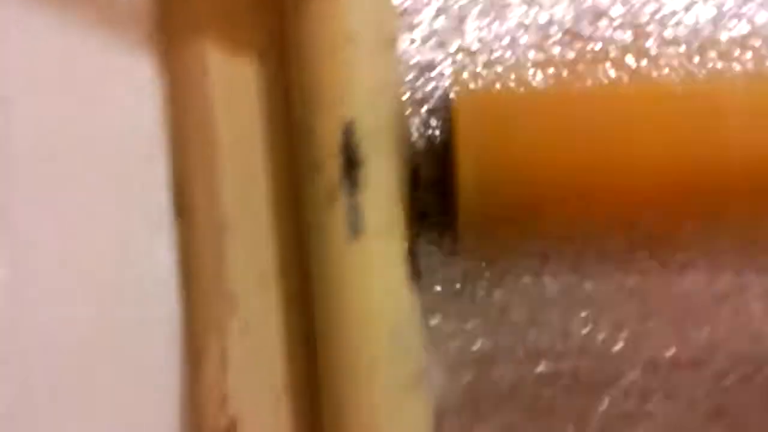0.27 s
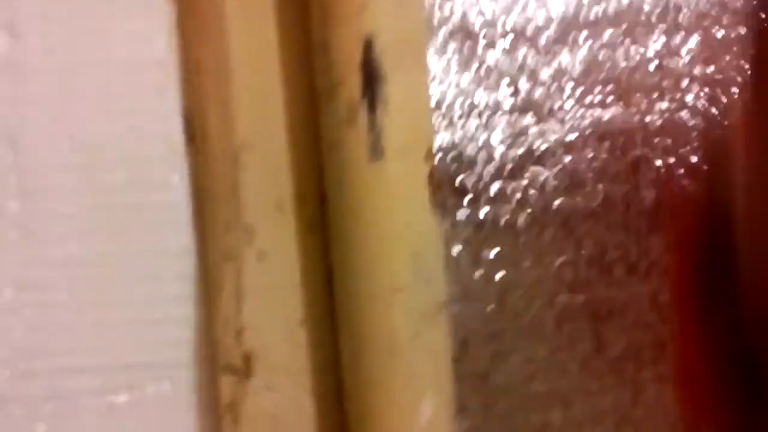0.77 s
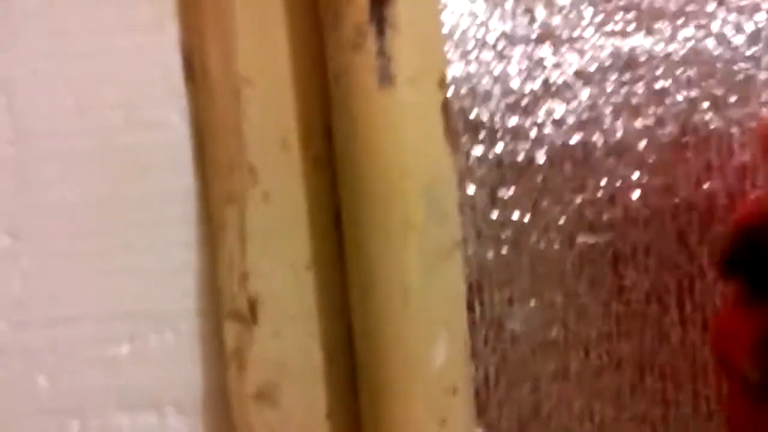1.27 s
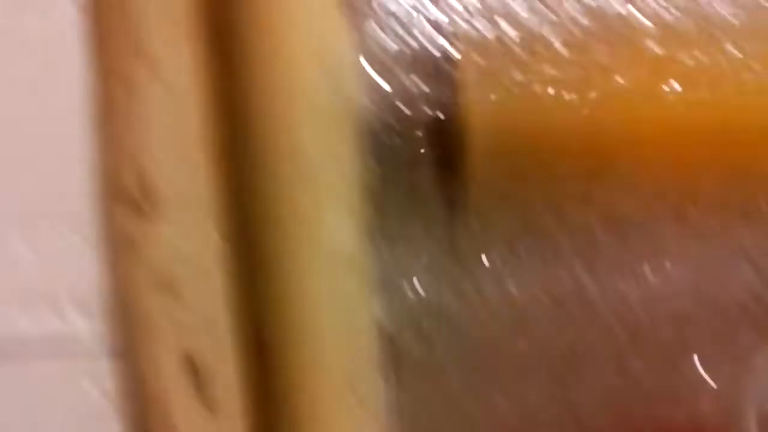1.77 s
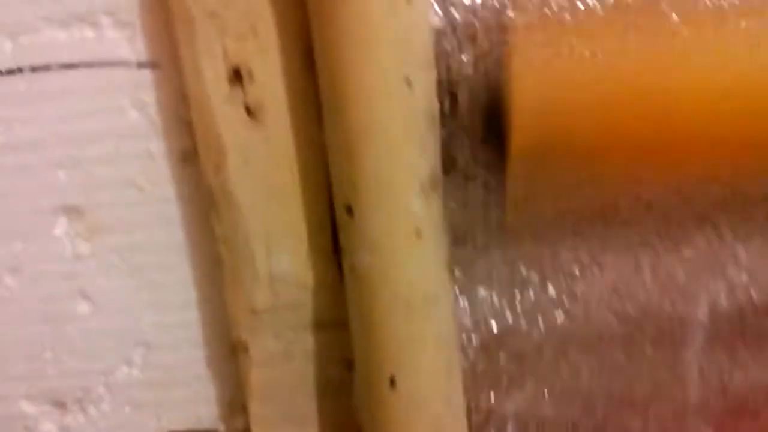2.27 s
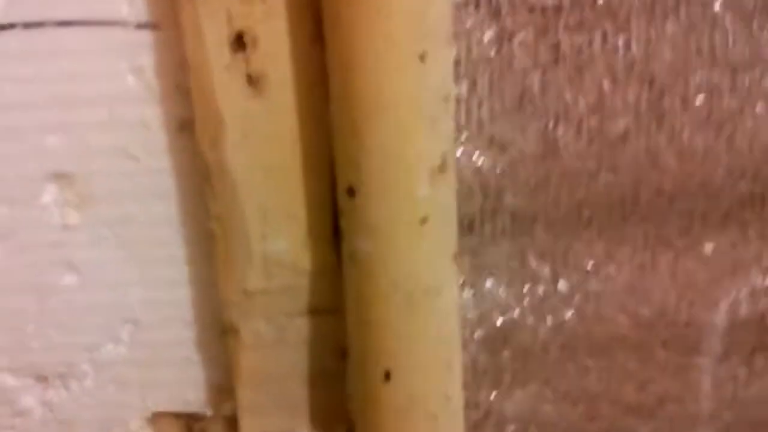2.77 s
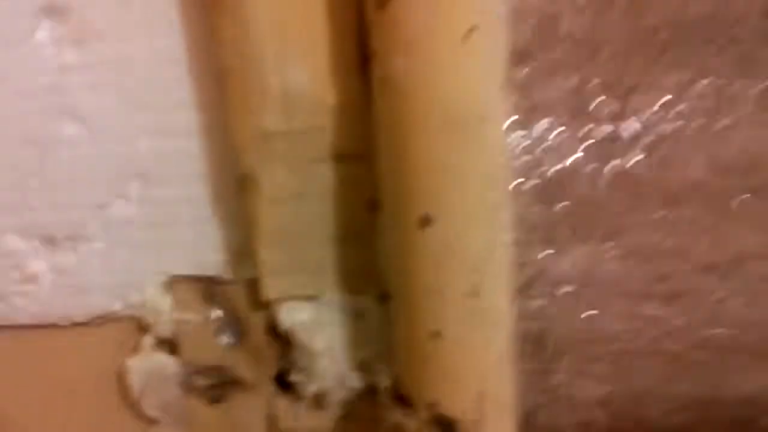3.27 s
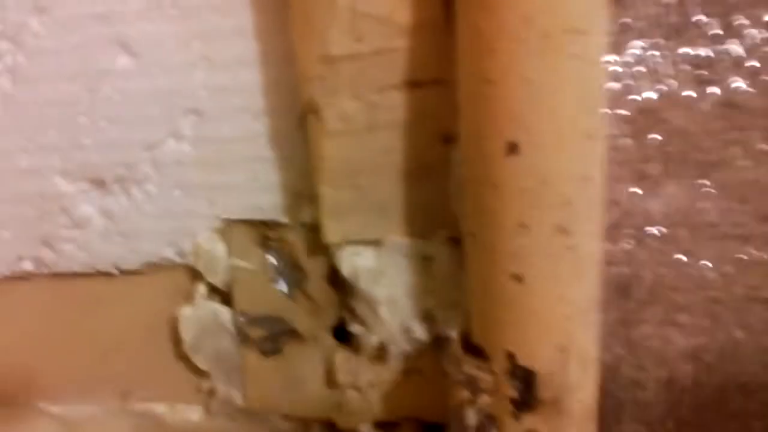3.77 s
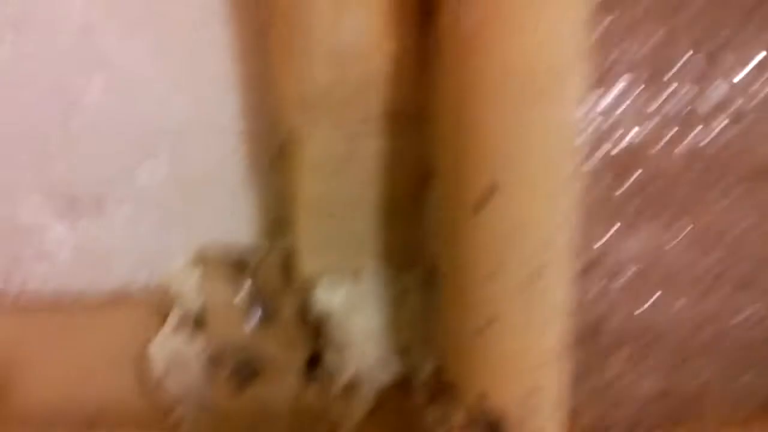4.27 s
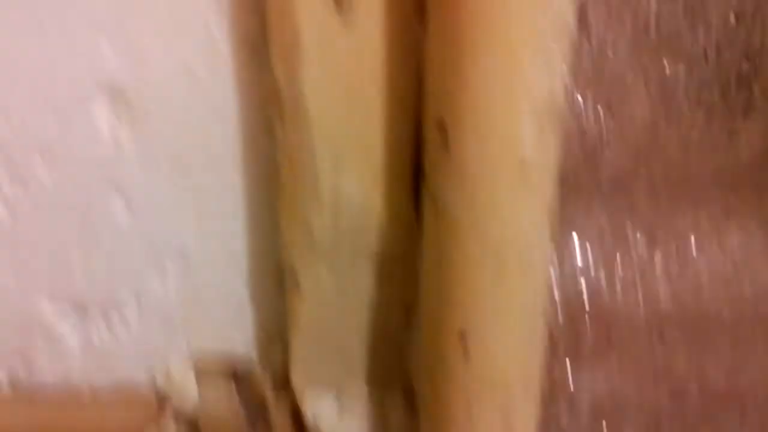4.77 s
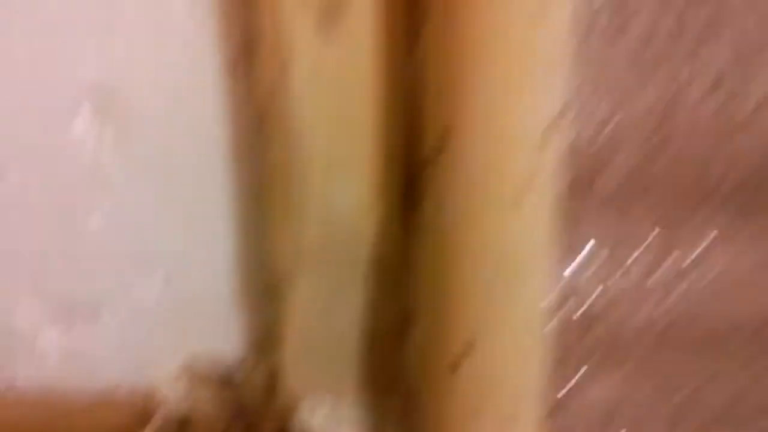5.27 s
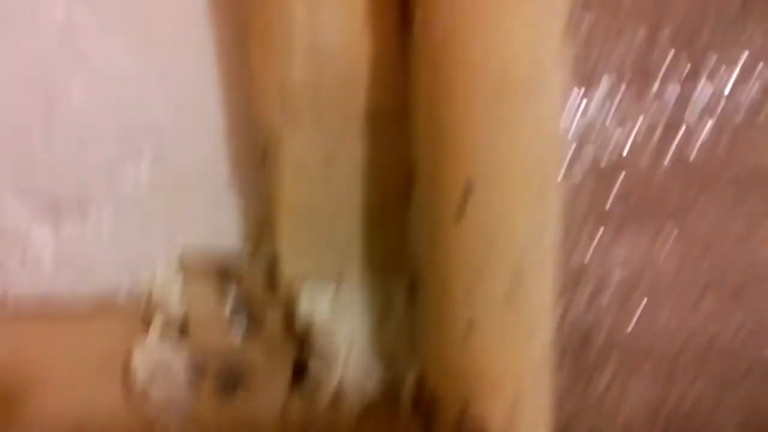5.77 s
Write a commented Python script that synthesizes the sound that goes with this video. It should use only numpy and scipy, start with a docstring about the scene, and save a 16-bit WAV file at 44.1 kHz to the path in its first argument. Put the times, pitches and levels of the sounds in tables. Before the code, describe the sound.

Brisk hissing roller strokes on foil indoors, broken by dense tacky crackles and snaps that ring the board, later settling into plain rubbing.

```python
"""A hand roller is pushed up and down over foil-faced foam glued to the wall of a small bare room.
Shaped noise and tiny clicks make its hiss on the foil, which falls quiet at each turn; noise swells to
a hollow note over air pockets. Where the board is loose, tacky adhesive crackles in dense bursts of
clicks that ring the board. The last strokes, over well-stuck foam, mostly rub, with two faint snaps.
A low wall drone, a rattling metal part and still air complete the scene."""
import sys
import numpy as np
from scipy import signal
from scipy.fft import rfft, irfft, next_fast_len
from scipy.io import wavfile
from scipy.ndimage import uniform_filter1d

SR = 44100
rng = np.random.default_rng(int(sys.argv[2]) if len(sys.argv) > 2 else 0)


def master_out(mix):
    """Clip the mix to full scale and print it as 16-bit PCM to the path in sys.argv[1]."""
    frames = np.transpose(np.atleast_2d(mix))
    ceiling = np.clip(frames, -1, 1)
    pcm = np.round(ceiling * 32767).astype(np.int16)
    wavfile.write(sys.argv[1], SR, pcm)


N = 265702

T = np.arange(N) / SR  # time of every sample, s
SIZE = next_fast_len(N + SR)  # filter length with spare room for tails
HZ = np.maximum(np.arange(SIZE // 2 + 1) * SR / SIZE, 1)
LAST_TURN_S = 6.206
PORT_LAG_S = .00015  # the left port hears the wall later
TOP_HZ = 15550

# Roller strokes, each lasting until the next:
# start t/s, place of top speed (0-1 of the stroke), relative level/dB, foil sizzle/dB, wall drone/dB
STROKE_TABLE = [ (-.2, 0.87, -50, -5, -9), (.13, 0.23, -46, -1.5, -7), (.49, 0.41, -44, -4.5, -7),
                (.818, 0.72, -39, -4, -15), (1.16, 0.35, -44.5, -5, -12.5), (1.44, 0.72, -38, -1.5, -18),
                (1.741, 0, -47.5, 3.5, -22), (2.011, 0.64, -40, -9, -18.5), (2.271, 0.3, -42.5, -7, -10),
                (2.499, 0.64, -34.5, -5, -14.5), (2.88, 0.8, -46, 4, -16), (3.079, 0.26, -41, 2, -6),
                (3.412, 0.95, -51.5, -3, -5), (3.631, 0, -47, -6, -9.5), (4.018, 0.53, -42, 2.5, -12.5),
                (4.544, 0.8, -45.5, -2.5, -15.5), (5.107, 0.59, -35, -5.5, -13),
                (5.712, 0.98, -31.5, -7, -7.5)]
# Places where the rub swells to a hollow note over air pockets: crest t/s, half length/s, relative level/dB
POCKET_TABLE = [(0.316, 0.079, -49), (0.92, 0.047, -46.5), (1.582, 0.077, -50), (1.89, 0.065, -44),
                (2.107, 0.048, -42.5), (2.98, .08, -47), (3.544, 0.08, -50.5), (4.28, 0.17, -51.5),
                (4.557, 0.097, -60), (4.914, 0.092, -45), (5.255, 0.082, -40), (5.569, 0.063, -44)]
# The hand eases off for a moment and the rub loses its body: t/s, level of the body/dB
PRESSURE_CURVE = [(4.46, -5.5), (4.56, -14), (4.72, -24), (4.77, -5.5)]
# Spectrum of roller on foil: f/Hz, relative level/dB
RUB_SPECTRUM = [(30, -9), (80, -4), (160, -2), (400, 6.5), (800, 4), (1250, -2.5), (2000, -1.5),
                (3200, -2.5), (4500, -2.5), (6500, -3), (8200, -13.5), (11000, -13.5), (15500, -19.5)]
# Spectrum of the still room: f/Hz, relative level/dB
AIR_SPECTRUM = [(18, -47), (30, -13.5), (136, -15.5), (346, -2), (754, -17), (1370, -37), (6360, -14.5),
                (8920, -40), (15000, -40)]
# Single snaps of the board: t/s, relative level/dB, brightness f/Hz
SNAP_TABLE = [(.076, -7.5, 1090), (.364, -12.5, 2500), (.389, -10.5, 4000), (.395, -6.5, 2500),
              (1.012, -4.5, 3190), (1.615, -18.5, 2000), (1.634, 1, 2980), (1.763, -7.5, 1800),
              (2.203, -4.5, 1950), (2.309, -17.5, 1700), (2.599, -9.5, 1750), (2.694, -8, 4500),
              (2.711, -4, 6000), (2.766, -11, 5500), (2.788, -3, 1400), (2.906, -20, 1390),
              (3.159, -11, 4000), (3.528, -19, 940), (3.724, -8.5, 3050), (3.747, -7, 6000),
              (3.895, -33, 8000), (5.439, -25.5, 4420), (5.778, -21, 2600)]
# Bursts of adhesive crackle: start t/s, length/s, place of the crest (0-1 of the length),
# relative level/dB, brightness f/Hz, boom level/dB, boom pitch f/Hz, foil crunch level/dB
CRACKLE_TABLE = [ (0.361, 0.08, 0.4, -16.5, 2960, 7, 317, -9), (.499, .013, 1, -26, 2000, 5.5, 220, -11),
                 (1.001, .11, 0.5, -12.5, 2850, 5, 322, -12.5),
                 (1.613, 0.088, 0.48, -11, 2400, 2, 360, -8.5),
                 (2.164, .042, 0, -15.5, 2600, -5, 280, -10.5),
                 (2.312, 0.011, 0.8, -26.5, 1700, -7, 250, -13),
                 (2.597, 0.053, 0.48, -12.5, 2460, -8, 600, -8.5),
                 (2.703, 0.016, .4, -18.5, 4060, -13.5, 298, 2), (2.734, .067, 0.7, -26, 3570, 4, 200, -3),
                 (2.786, 0.043, 0, -24.5, 2340, 5.5, 240, -14),
                 (2.903, .012, .53, -31, 1770, 5.5, 260, -13), (3.155, .056, 0.1, -18.5, 2000, 5, 304, -21),
                 (3.207, 0.074, 0.04, -22.5, 2800, 2, 270, -12),
                 (3.702, 0.039, 0.93, -21.5, 3400, -1, 490, -2.5),
                 (3.743, 0.031, .9, -26.5, 3100, 8, 160, 6)]
# Spectrum of one snap: f/Hz, relative level/dB
SNAP_SPECTRUM = [(30, -16.5), (100, -18), (150, -6), (250, -1.5), (600, 4.5), (1100, 4.5), (2000, 5.5),
                 (3200, 5), (4200, -2), (5300, -4.5), (7000, -11), (10000, -17.5), (15000, -37)]
# Resonances of the board: f/Hz, distance where the lift halves/Hz, relative lift/dB
BOARD_RESONANCES = [(141, 18, 11), (261, 15, 11), (287, 16, 6), (355, 13, 5), (399, 13, 5), (464, 15, 8),
                    (545, 22, 4), (630, 13, 12), (680, 14, 4), (775, 22, 3), (828, 16, 5), (936, 18, 5),
                    (1268, 20, 6), (1528, 18, 4), (1711, 20, 5), (1818, 20, 4), (2103, 22, 4),
                    (2266, 22, 4), (3300, 140, 4)]
# Thin rings of a small metal part, shaken only by the hardest crackle: f/Hz, width/Hz, relative level/dB
METAL_RINGS = [(7730, 60, -1), (7870, 50, 0), (8560, 25, -6)]
# Decay of the room: f/Hz, time to fall by 60 dB/s
ROOM_DECAY = [(100, 0.65), (300, 0.42), (700, 0.19), (2000, 0.2), (5000, 0.13), (12000, 0.03)]
# The two microphone ports: f/Hz, likeness (0-1), left minus right/dB
PORT_TABLE = [(101, .94, -2.5), (350, 0.94, -2.5), (800, 0.99, 0), (1400, 0.6, 3.5), (2300, 0.25, 3.5),
              (4120, 0, -2), (8000, 0.03, 0), (14000, 0, -1)]


def undb(db):
    """Turn decibels into gain."""
    return 10 ** (np.asarray(db) / 20)


def rms(x):
    """Give the average strength (root mean square)."""
    return np.sqrt(np.mean(x ** 2))


def curve(rows):
    """Draw straight lines between table points to get a value at every sample."""
    return np.interp(T, *np.transpose(rows))


def at(rows, hz, axis=1):
    """Read one column of a table on a log-frequency axis."""
    rows = np.array(rows)
    return np.interp(np.log(hz), np.log(rows[:, 0]), rows[:, axis])


def shape(x, response):
    """Filter a sound by a frequency response."""
    return irfft(rfft(x, SIZE) * response, SIZE)[..., :N]


def causal(db):
    """Minimum-phase response: the sound starts sharply and rings afterwards."""
    cepstrum = irfft(np.log(undb(db)), SIZE)
    # fold the half before time zero onto the half after it
    cepstrum[1:SIZE // 2] *= 2
    cepstrum[SIZE // 2 + 1:] = 0
    return np.exp(rfft(cepstrum))


def resonance(hz, width):
    """Band-pass response with gain 1 at the centre."""
    return 1 / (1 + 1j * (HZ ** 2 - hz ** 2) / (HZ * width))


def soften(x, hz):
    """Dull a sound with a second-order low-pass."""
    return signal.sosfilt(signal.butter(2, hz, fs=SR, output="sos"), x)


def walk(rate):
    """Smooth random wandering with rms 1; rate is in new values per second."""
    step = int(SR / rate)
    held = np.repeat(rng.standard_normal(N // step + 1), step)
    y = uniform_filter1d(held, step)[:N]
    return y / rms(y)


def grains(count, per_s, spread):
    """Random tiny clicks of very unequal size, scaled to rms 1."""
    chance = rng.random((count, 2))
    size = undb(-spread * np.log(np.maximum(chance[:, 1], .02)))
    y = (chance[:, 0] < per_s / SR) * size * rng.choice([-1, 1], count)
    return y / (rms(y) + 1e-9)


def add(track, s, sound):
    """Mix a sound into a track at a time in seconds."""
    i = int(s * SR)
    track[i:i + len(sound)] += sound[:N - i]


def ports(mid, side):
    """Left and right: alike in the bass, mostly unrelated in the treble, the left a little late."""
    like, lean_db = at(PORT_TABLE, HZ), at(PORT_TABLE, HZ, axis=2)
    mid = shape(mid, np.sqrt((1 + like) / 2))
    side = shape(side, np.sqrt((1 - like) / 2))
    late = np.exp(-2j * np.pi * HZ * PORT_LAG_S)
    left = shape(mid + side, undb(lean_db / 2) * late)
    right = shape(mid - side, undb(-lean_db / 2))
    return np.array([left, right])


def room(x):
    """The room scatters a sound into a dense tail of unit energy whose bass lasts longest."""
    tail, noise = np.zeros(SR), rfft(rng.standard_normal(SR))
    centres = np.log(np.array(ROOM_DECAY)[:, 0])
    for (hz, t60), band in zip(ROOM_DECAY, np.eye(len(ROOM_DECAY))):
        weight = np.interp(np.log(np.arange(len(noise)) + 1), centres, band)
        tail += irfft(noise * weight) * np.exp(-np.log(1000) * T[:SR] / t60)
    return signal.fftconvolve(x, tail / np.sqrt(np.sum(tail ** 2)))[:N]


def scatter(x, fade_s, db):
    """Waves run about in the board for milliseconds; every spot has its own echoes and so its own colour."""
    fade = np.exp(-T[:SR // 20] / fade_s)
    waves = rng.standard_normal(len(fade)) * fade * undb(db) / np.sqrt(np.sum(fade ** 2))
    waves[0] += 1  # the direct sound
    return signal.fftconvolve(x, waves / np.sqrt(np.sum(waves ** 2)))


def motion(steepness=1.08, rest=0.13):
    """The roller speeds up and slows to each turn: gives its gain, and sizzle and drone in dB."""
    starts, crests, *columns = np.transpose(STROKE_TABLE)
    turns = np.append(starts, LAST_TURN_S)
    tops = starts + np.clip(crests, .05, .95) * np.diff(turns)
    # turns and top speeds alternate: speed is 0 at one and 1 at the other
    marks = np.sort(np.append(turns, tops))
    speed = np.abs(np.sin(np.pi / 2 * np.interp(T, marks, np.arange(len(marks)))))
    db, sizzle_db, drone_db = (np.interp(T, tops, column) for column in columns)
    return undb(db) * (rest + speed ** steepness), sizzle_db, drone_db


def pockets(edge_db=-15):
    """Gain of the hollow note: a bell-shaped swell as the roller crosses each air pocket."""
    return sum(undb(db + edge_db * ((T - s) / half) ** 2) for s, half, db in POCKET_TABLE)


def roller(stroke, sizzle_db, grit_db=-8, sizzle_hz=9000, body_hz=1600, flicker_db=1.4):
    """The roller drags over the embossed foil: fine hiss with grit, and a hollow note over air pockets."""
    stroke = stroke * undb(flicker_db * walk(49))
    swell, pair = pockets(), []
    for _ in range(2):  # one sound for mid, one for side
        grit = undb(grit_db) * grains(N, per_s=1500, spread=6.4)
        rub = shape(rng.standard_normal(N) + grit, causal(at(RUB_SPECTRUM, HZ)))
        rub = rub / rms(rub)
        body = shape(rub, 1 / (1 + (HZ / body_hz) ** 4))
        sizzle = shape(rub, 1 / (1 + (sizzle_hz / HZ) ** 4))
        # change the level of the low and the high part only
        rub = rub + (undb(curve(PRESSURE_CURVE)) - 1) * body + (undb(sizzle_db) - 1) * sizzle
        hollow = shape(rng.standard_normal(N), resonance(693, 480) ** 2)
        pair.append(stroke * rub + swell * hollow / rms(hollow))
    return ports(*pair)


def rumble(push, hz=170, width_hz=230):
    """The rolling shakes the wall; its low drone lingers through the turns."""
    shaking = push * shape(rng.standard_normal(N), resonance(hz, width_hz) ** 2)
    drone = room(shaking)
    return drone / rms(drone) * rms(push)


def air(db=-69):
    """The still room: steady noise with the colour of the air table."""
    hush = ports(*shape(rng.standard_normal((2, N)), undb(at(AIR_SPECTRUM, HZ))))
    return undb(db) * hush / rms(hush)


def snaps(gain_db=12):
    """Larger spots let go at once; the softer the release, the duller the knock."""
    out, click = np.zeros((2, N)), signal.unit_impulse(256)
    for s, db, bright_hz in SNAP_TABLE:
        for track in out:
            knock = scatter(soften(click, bright_hz), fade_s=0.0037, db=6)
            add(track, s, undb(db + gain_db) * knock)
    return out


def adhesive(start_db=-6, end_db=-5, release_s=0.012, boom_q=1.45, boom_s=0.034, darkening=0.87,
             crunch_hz=4200, clump_db=2):
    """Threads of glue snap in quick clumps, then die out; as the patch grows, it sounds duller and booms more."""
    out, clumps = np.zeros((2, N)), undb(clump_db * walk(220))
    for s, length, crest, db, bright_hz, boom_db, boom_hz, crunch_db in CRACKLE_TABLE:
        t = T[:int(3 * length * SR)]  # leaves time for the burst to die out
        u, after = t / length, np.maximum(t - length, 0)
        arch_db = np.interp(u, [0, np.clip(crest, .01, .99), 1], [start_db, 0, end_db])
        fade_out = np.minimum(u[-1] - u, 1)
        size = undb(db) * fade_out * np.interp(s + t, T, clumps)
        late = np.clip(u - crest, 0, 1)
        for track in out:  # the snaps come from all over the patch, so mid and side hear different ones
            threads = grains(len(t), per_s=5000, spread=2.4) * size * undb(arch_db)
            threads = threads * np.exp(-after / release_s)
            flaps = grains(len(t), per_s=900, spread=1.3) * size * np.minimum(u, 1)
            flaps = flaps * np.exp(-after / boom_s)
            bright, dull = soften(threads * (1 - late), bright_hz), soften(threads * late, bright_hz * darkening)
            boom = undb(boom_db) * signal.lfilter(*signal.iirpeak(boom_hz, boom_q, fs=SR), flaps)
            crunch = undb(crunch_db) * signal.lfilter(*signal.iirpeak(crunch_hz, 2, fs=SR), threads)
            add(track, s, scatter(bright + dull + boom + crunch, fade_s=0.0035, db=-6.5))
    return out


def board(force, room_db=-5, gain_db=2.5, ring=0.95, room_ring=0.41):
    """Each snap cracks and rings the board's resonances; the room answers with a broader rumble."""
    lift_db = sum(db / (1 + ((HZ - hz) / width) ** 2) for hz, width, db in BOARD_RESONANCES)
    snap_db = at(SNAP_SPECTRUM, HZ)
    direct = shape(force, causal(snap_db + ring * lift_db))
    far = shape(force, causal(snap_db + room_ring * lift_db))
    mid, side = (near + undb(room_db) * room(x) for near, x in zip(direct, far))
    return undb(gain_db) * ports(mid, side)


def rattle(shake, slack=.15, db=-57):
    """A loose metal part chatters whenever the shaking exceeds its slack."""
    knocks = np.maximum(np.abs(shake) - slack, 0) * rng.standard_normal(shake.shape)
    ring = shape(knocks, sum(undb(lift) * resonance(hz, width) for hz, width, lift in METAL_RINGS))
    return undb(db) * ring / (rms(ring) + 1e-9)


def scene(drag_db=-5):
    """Crackling board, roller and room; the roller also drags harder over each air pocket."""
    stroke, sizzle_db, drone_db = motion()
    rub = roller(stroke + undb(drag_db) * pockets(), sizzle_db)
    drone = rumble(stroke * undb(drone_db))
    crackle = board(adhesive() + snaps())
    return rub + drone + air() + crackle + rattle(crackle)


def record(dry):
    """The recorder rounds the loudest peaks and cuts the top of the treble."""
    rounded = 1.1 * np.tanh(dry / 1.1)
    return signal.sosfilt(signal.ellip(10, .2, 70, TOP_HZ, fs=SR, output="sos"), rounded)


dry = scene()
out = record(dry)
master_out(out)
```